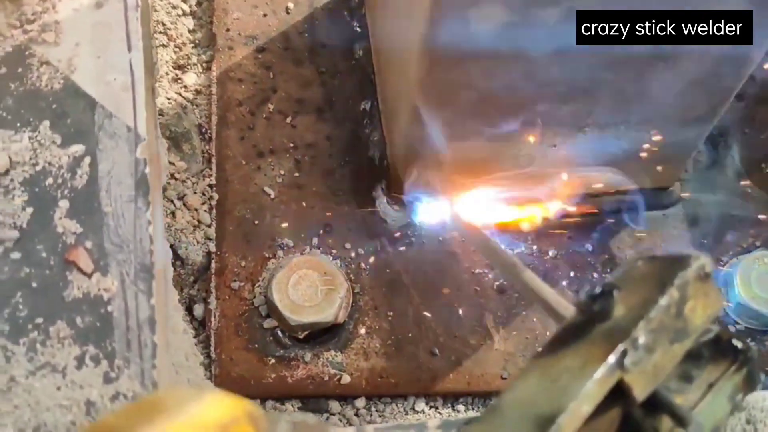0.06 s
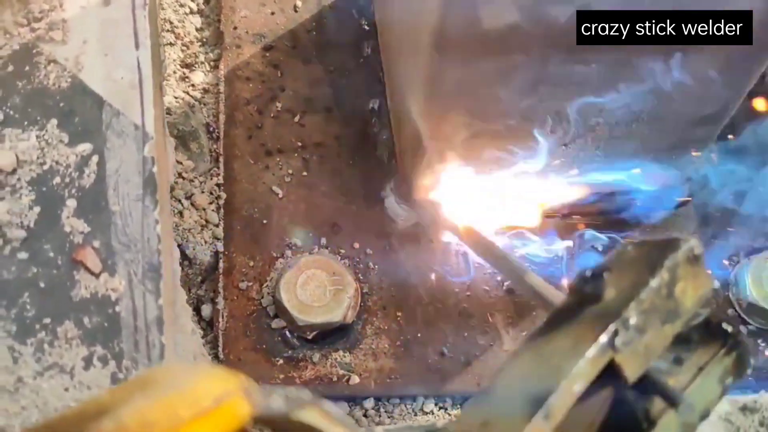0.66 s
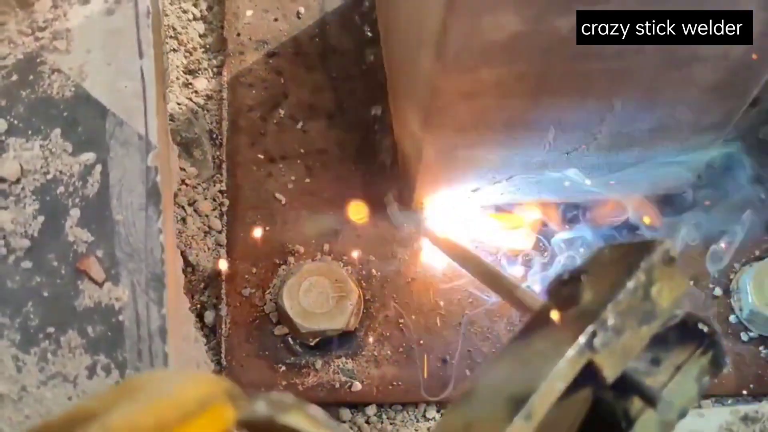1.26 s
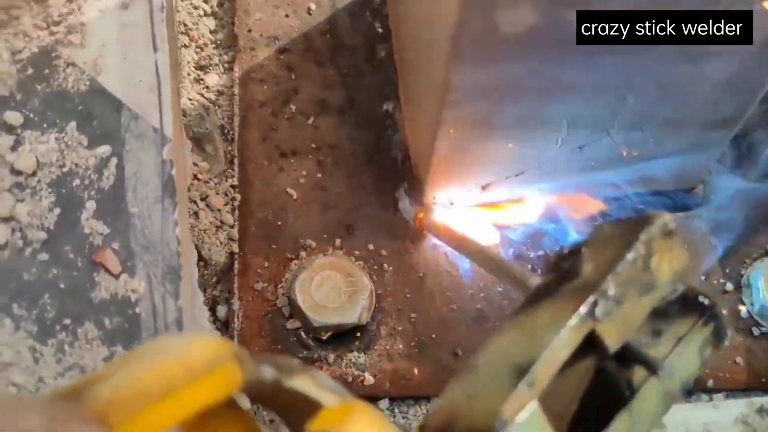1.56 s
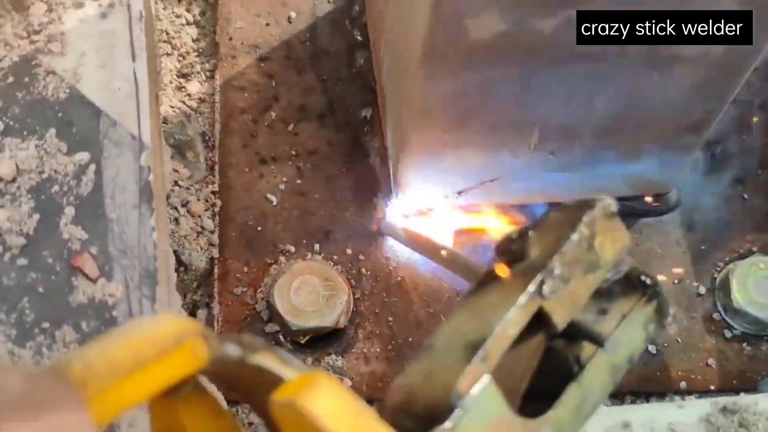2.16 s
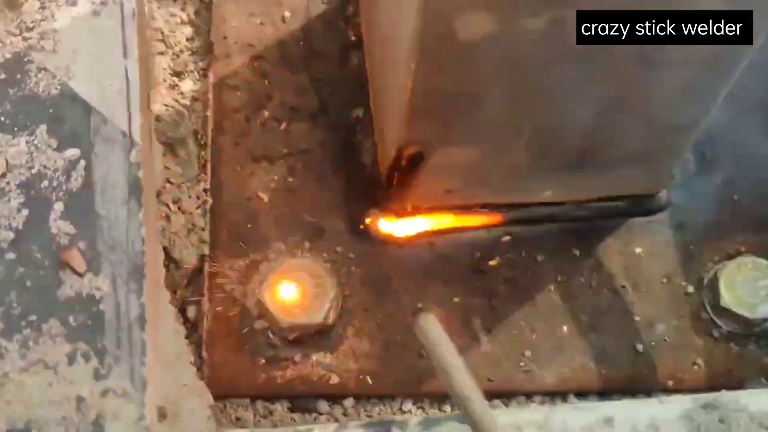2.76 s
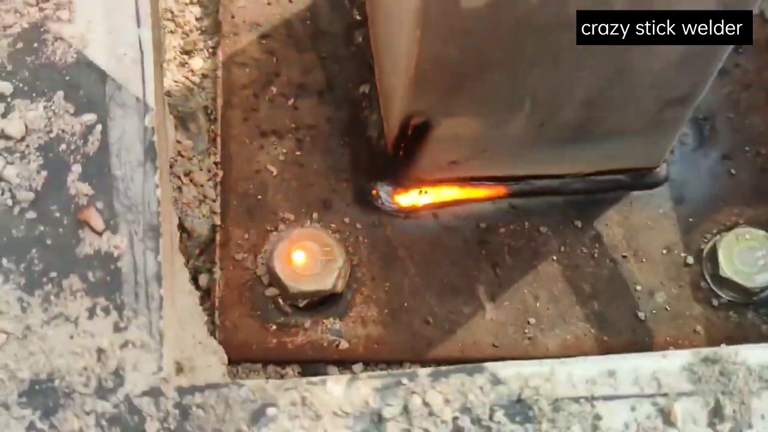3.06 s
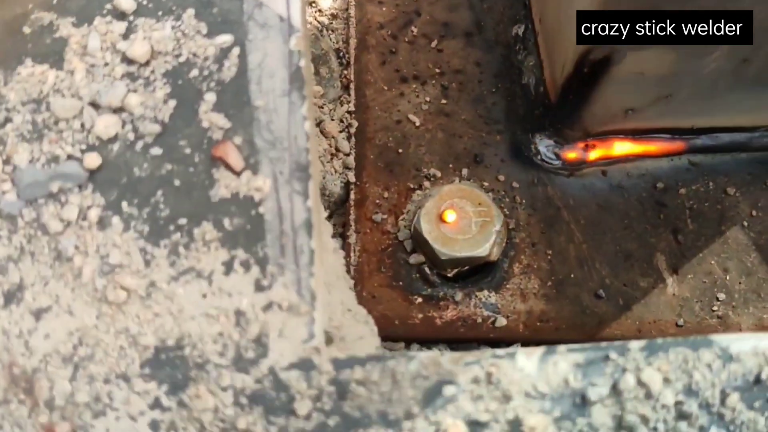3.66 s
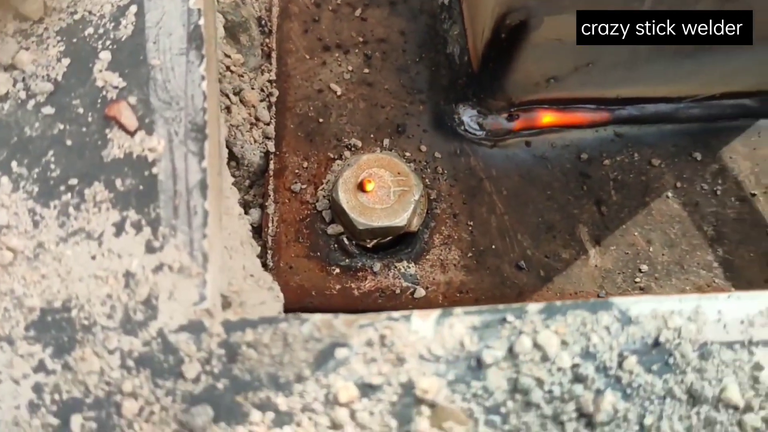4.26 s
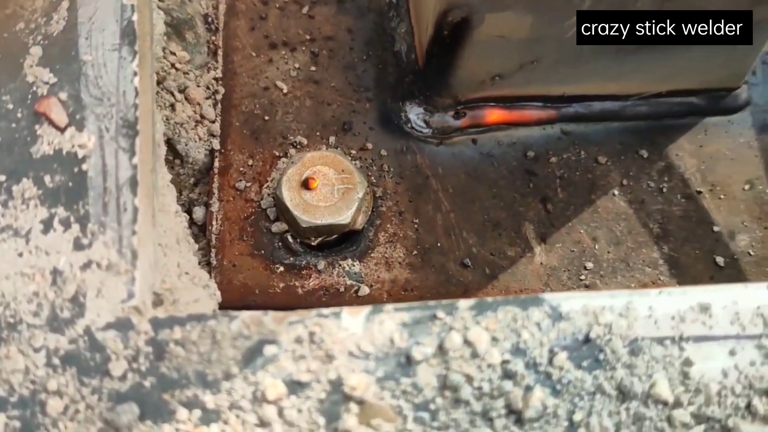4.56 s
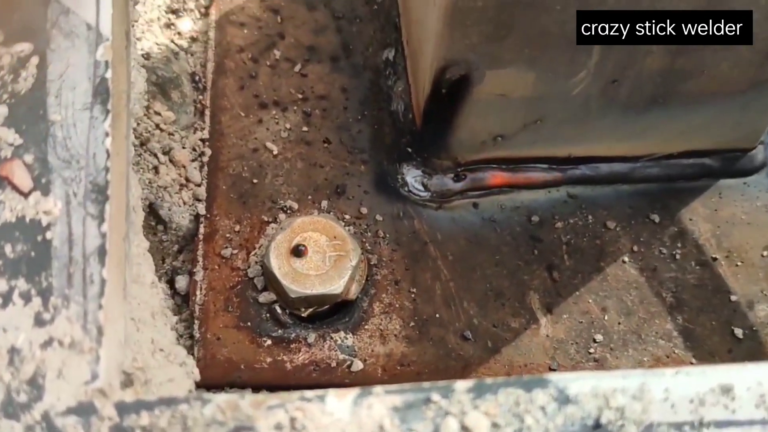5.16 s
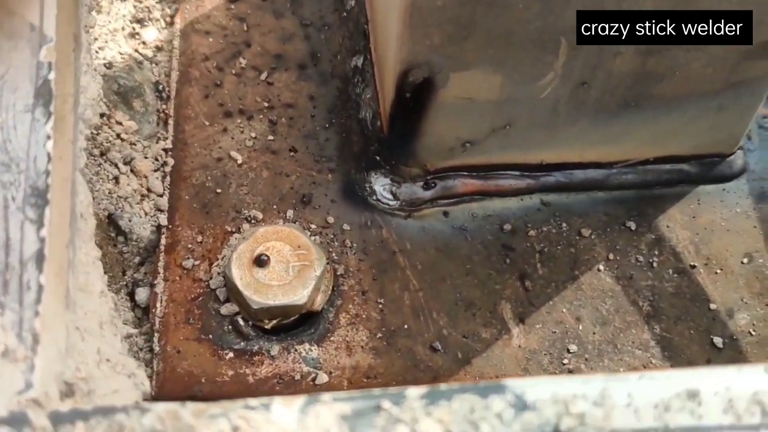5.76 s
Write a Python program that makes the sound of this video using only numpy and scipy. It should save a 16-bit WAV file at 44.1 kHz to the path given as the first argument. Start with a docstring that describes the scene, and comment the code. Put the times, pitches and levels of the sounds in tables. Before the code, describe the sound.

A stick welding arc sizzles and crackles close to the microphone, dotted with dull, irregular pops and bright spits of molten metal. After about three seconds it flares with a brief rasp and cuts out, leaving a faint fizz. The rod scrapes softly over grit, and its metal holder clacks several times as it is put down with a few soft knocks. A machine hums faintly in the background of the work site.

```python
"""A close sizzle, dotted with dull pops: a stick-welding arc lays a bead at the foot of a steel post.
Tiny discharges crackle over a rush of gas, and bursting drops of metal send out pressure pulses.
The arc flares as the rod is pulled away, and dies with a faint fizz. Then the rod scrapes over grit;
its holder clacks as impacts excite its modes, and is put down. A machine hums in the background."""
import sys
import numpy as np
from scipy import signal
from scipy.fft import rfft, irfft, next_fast_len
from scipy.io import wavfile
from scipy.ndimage import uniform_filter1d

SR = 44100
rng = np.random.default_rng(int(sys.argv[2]) if len(sys.argv) > 2 else 0)


def store_pcm(level_fs):
    """Save levels as 16-bit WAV."""
    pcm = np.round(np.clip(level_fs, -1, 1) * 32767).astype(np.int16)
    wavfile.write(sys.argv[1], SR, np.atleast_2d(pcm).T)


N = 256203
TIME = np.arange(N) / SR
ARC_OUT_S = 2.905

# Levels in tables are relative; pan is the level of the left side over the right.
# largest bursting drops: (time [s], level [dB], pitch [Hz], pan [dB], likeness of the sides [ratio])
DROPS = [(0.0379, -0.5, 522.6, -2.5, -0.84), (0.0778, 0.5, 365, 0, 1), (0.0892, -8, 448, -2, 0.65),
         (0.1046, -12, 447, -6, 0.18), (0.191, 0.5, 465, 3, -0.71), (0.236, -0.5, 390, 5, -1.2),
         (0.2634, -9, 610, -8, -0.84), (0.276, -8.5, 483, -4, 0), (0.29, -2, 350, -7, -0.01),
         (0.331, -2.5, 404, -8.5, -1.6), (0.3713, -10.5, 423, -23, -0.45), (0.469, -1.5, 325, 20, 0.5),
         (0.4845, -2.5, 320, 8, 0.5), (0.6929, 1.5, 440, -5, -0.61), (0.809, -15, 480, 6, 0.6),
         (0.9218, 0.5, 355, 10, -1.14), (0.9587, 1.5, 510, -1.5, 0.18), (0.9833, -4, 494, 4, -0.86),
         (0.993, -2, 527, -3, -0.96), (1.087, 0.5, 416, 5.5, -0.64), (1.1477, -3, 427, 3.5, -0.98),
         (1.1747, -7, 430, -4, 0.48), (1.3078, -7.5, 550, -5, 0.83), (1.3384, -13, 520, -2, 0.5),
         (1.386, -1.5, 385, -9.5, 0.5), (1.4296, 0, 370, -0.5, 0.96), (1.4423, -4.5, 372, 2, 0.97),
         (1.6417, 1.5, 307, 2, 1), (1.7418, -2, 490, -10, -0.19), (1.812, -2.5, 350, 11, -0.39),
         (1.8463, -0.5, 383, 0.5, -0.93), (1.864, -4.5, 395, -28, -0.17), (1.9894, 0, 450, -12, -0.43),
         (2.0066, -1, 530, -24, 0.16), (2.0213, -2.5, 530, -26, 1), (2.027, -3.5, 600, -26, -0.13),
         (2.1636, 0, 420, -6, -0.17), (2.178, -1.5, 730, -10, -0.18), (2.1848, 1, 340.5, 3, 0.85),
         (2.2035, -9.5, 386, 10, 0.99), (2.217, -10, 450, -2, 0.58), (2.231, -1.5, 365, -24, -0.084),
         (2.2405, -13, 500, -4, -0.0036), (2.2468, -5, 520, -2, -1.2), (2.345, -3, 362, -27, -0.11),
         (2.4229, -6, 530, -7, -1.1), (2.4477, -4.5, 340, -15, -0.19), (2.4845, -3, 358, -0.5, -1),
         (2.5063, -9, 440, 6.5, -1), (2.5778, -5.5, 340, -21, -0.068), (2.593, -9.5, 460, 10, 1),
         (2.5994, -4, 566, -6.5, -0.39), (2.6252, -12.5, 450, -12, -0.16), (2.6559, -6, 563, -19, 1),
         (2.6726, -4, 405, -14, -0.2), (2.685, -4.5, 346, 9, 0.86), (2.718, -5.5, 360, 8, 0.65),
         (2.7327, -2.5, 487, -13, -0.44)]
# drops that bridge the gap: (time of the restrike [s], time choked before it [s], snap level [dB])
SHORT_CIRCUITS = [(0.7622, 0.006, -15), (2.7650, .001, -16)]
# spectrum of rushing gas: (frequency [Hz], spectral density [dB])
GAS_SPECTRUM = [(50, -4), (130, -10), (300, -11), (700, 2.5), (2200, 6), (2900, -4.5), (4000, -2.5),
                (11000, -16)]


def arc(hiss_db=-0.3, rush_db=-9.0, rush_follows=0.88, pan_db=-7, travel_db_per_s=2):
    """Source and filter: discharges in boiling metal sizzle in bright bands over a rush of gas."""
    # vigour of the arc: (time [s], level [dB])
    vigour = [(0.0, -36), (0.19, -31), (0.36, -36), (0.44, -28.5), (0.79, -32), (0.89, -25.5),
              (0.95, -32.5), (1.07, -33), (1.32, -26), (1.47, -31), (1.55, -27), (1.68, -34.5), (1.75, -30),
              (1.91, -37), (2.01, -34.5), (2.08, -33), (2.16, -31.5), (2.28, -42.5), (2.34, -33),
              (2.4, -37.5), (2.44, -30), (2.55, -41.5), (2.6, -33.5), (2.81, -38), (2.88, -40)]
    # bright peaks of the sizzle: (frequency [Hz], width [Hz], level [dB], pan [dB])
    sizzle_peaks = [(3410, 920, -6.5, 30.5), (4250, 840, -7.5, 19), (4960, 510, -7, -3),
                    (6220, 430, -1.5, 19), (6990, 140, 0, -17.5), (7505, 390, 2, 3), (8650, 270, 2, 3.5),
                    (9380, 640, -2.5, 2.5), (11920, 940, -1.5, 12.5), (12320, 280, -2.5, -24),
                    (13220, 420, 2, 6)]
    # peaks of the top hiss: (frequency [Hz], width [Hz], level [dB], pan [dB])
    hiss_peaks = [(14860, 360, -3, 1), (14800, 350, -5, -16), (15500, 340, 2.5, -1)]
    vigour_db, = in_time(vigour)
    mean_db = np.mean([db for s, db in vigour])
    flow_db = mean_db + rush_follows * (vigour_db - mean_db)
    flicker = boiling()
    sparks = rms_one(crackle(per_s=1400, smooth=.8, alike=.62))
    sparks = echoed(sparks, wet_db=-4, t60=.12)   # the corner between post and plate rings briefly
    sizzle = wavering_peaks(sparks, sizzle_peaks, waver_db=4.0, glide=0.021)
    hiss = from_db(hiss_db) * wavering_peaks(sparks, hiss_peaks, waver_db=0.5, glide=0.004)
    frying = crackle(per_s=900, smooth=1.4, alike=0.3)
    rush = from_db(flow_db + rush_db) * flicker * coloured(frying, GAS_SPECTRUM)
    sound = from_db(vigour_db) * (flicker * (sizzle + hiss) + spatter()) + rush
    return burning() * sound * panned(pan_db + travel_db_per_s * TIME)   # travel along the seam


def boiling(depth=0.22, build_s=0.025):
    """Amplitude modulation: a gain that flickers at random and boils up before each drop bursts."""
    bursts = np.zeros(N)
    bursts[[round(s * SR) for s, *_ in DROPS]] = 1
    build_up = decaying(bursts[::-1], build_s)[::-1]
    return rms_one((1 + depth * build_up) * from_db(1.2 * drift(150) + drift(35)))


def burning(choked_gain=.15, lull_s=0.027, lull_db=-7.5):
    """Gating: the arc's gain collapses in a short circuit, stays low briefly, and ends with the arc."""
    gain = np.clip((ARC_OUT_S - TIME) / 0.013, 0, 1)
    for s, choked_s, _ in SHORT_CIRCUITS:
        gain[(TIME > s - choked_s) & (TIME < s)] *= choked_gain
        gain[(TIME > s) & (TIME < s + lull_s)] *= from_db(lull_db)
    return gain


def wavering_peaks(x, peaks, waver_db, glide):
    """Random modulation: the sizzle's bright peaks waver in pitch and strength; rms 1."""
    out = 0
    for hz, width, db, pan_db in peaks:
        band = resonance(x, hz * (1 + glide * drift(10.7)), width)
        out = out + band * panned(pan_db) * from_db(db + waver_db * drift(15.3))
    # the peaks trade strength while their total power stays the same
    power = uniform_filter1d(np.mean(out ** 2, axis=0), size=SR // 16)
    return rms_one(out / np.sqrt(power + 1e-12))


def spatter(grit_per_s=75, grit_db=-2):
    """Shot noise: a few bright spits and many lesser ones, each dying within milliseconds."""
    # bright spits: (time [s], level against the sizzle [dB])
    spit_events = [(0.168, 7), (0.1902, 9), (0.2367, 8), (0.3728, 10), (0.4364, 10), (0.6965, 9),
                   (0.735, 9), (1.308, 7), (1.3864, 8), (1.5476, 10), (1.7296, 9), (2.4235, 9), (2.798, 12)]
    spits = sum(from_db(db) * swell(s, rise_s=.0004, fall_s=.0026) for s, db in spit_events)
    impulses = (rng.random(N) < grit_per_s / SR) * np.minimum(rng.exponential(1, N), 2)
    grit = from_db(grit_db) * decaying(impulses, fall_s=0.0011)
    return (spits + grit) * bass_cut(noise(0.093), hz=1800)


def pops(front_ratio=3.47, snap_db=-10, snap_spread_db=4, crack_db=-16, rebound=0.19):
    """Pulse radiation: drops burst with a sharp front and a swell of gas, then the pool rebounds."""
    out = np.zeros((2, N))
    for s, db, hz, pan_db, alike in DROPS:
        sign, lag, delay, recoil, sharpness = rng.uniform(-1, 1, 5)
        sides = panned(pan_db) * np.sign(sign)
        body = out_of_step(puff(db, hz), hz, alike) * sides
        # heavy, low drops thump roundly; light ones snap
        front_db = db + snap_db + snap_spread_db * (sharpness + 2 * np.log2(hz / 450))
        front_hz = front_ratio * hz
        front = out_of_step(puff(front_db, front_hz, stretch=0.77), front_hz, (1 + alike) / 2) * sides
        for side, channel in zip((1, -1), np.eye(2)[:, :, None]):
            add(out, s + side * lag * 0.00019, (body + front) * channel)
            add(out, s + 0.00156 * (2 + side * delay), rebound * recoil * body * channel)
        add(out, s, crack(front_db + crack_db) * panned(pan_db))
    # a drop is too large to radiate the treble
    return treble_cut(bass_cut(out, hz=116), hz=2900, order=4)


def puff(level_db, hz, stretch=1):
    """A bipolar pressure pulse: swelling gas gives one fast push and a slower pull."""
    phase = 2 * np.pi * hz * TIME[:SR // 25] / stretch
    return from_db(level_db) * phase * (2 - phase) * np.exp(-phase)


def crack(level_db, t60=0.032):
    """A broadband transient: the sharp edge of a burst, as fast-decaying noise."""
    t = TIME[:SR // 20]
    edge = coloured(noise(0.2, size=len(t)), [(200, 7.5), (900, 2.0), (2200, 2.5), (9000, -39.0)])
    return edge * from_db(level_db - 60 * t / t60)


def churn(level_db=-31.0, fall_at_400_hz_s=0.0099, spray_db=-7):
    """Damped motion: the pool gurgles and sprays at each pop, for longer after heavy, low drops."""
    # spectrum of the churning pool: (frequency [Hz], spectral density [dB])
    pool_spectrum = [(80, -13), (280, 2.5), (650, -5), (1500, -4), (3000, -35)]
    stirring = sum(from_db(db + level_db) * swell(s, .0007, fall_at_400_hz_s * 400 / hz) * panned(pan_db)
                   for s, db, hz, pan_db, _ in DROPS)
    spray = coloured(crackle(per_s=900, smooth=1, alike=.3), GAS_SPECTRUM)
    gurgle = coloured(noise(1.0), pool_spectrum)
    return stirring * (gurgle + from_db(spray_db) * spray)


def restrikes(t60=0.012, crack_db=10, crack_hz=1400):
    """Electrical breakdown: the choked arc strikes again with one sharp pulse and a bright spray."""
    out, t = np.zeros((2, N)), TIME[:SR // 25]
    for s, _, db in SHORT_CIRCUITS:
        spray = coloured(noise(0.056, size=len(t)), [(1800, -15.5), (6000, -17), (15000, 15.5)])
        add(out, s, spray * from_db(db - 60 * t / t60) + puff(db + crack_db, crack_hz))
    return bass_cut(out, hz=400)


def bubbling(count=190, level_db=-25, size_db=7):
    """Pitch falls with size: small slag bubbles burst at random, the larger ones lower and louder."""
    out = np.zeros((2, N))
    for when, size, sign, where in rng.uniform(-1, 1, (count, 4)):
        pulse = np.sign(sign) * puff(level_db + size_db * size, 600 * 2 ** -size, stretch=0.55)
        add(out, (when + 1) / 2 * ARC_OUT_S, pulse * panned(10 * where))
    return bass_cut(out, hz=75)


def flare(start_s=2.848, level_db=-24.5, sputter_db=2):
    """Noise-driven resonance: the stretched arc rasps, wavers and sputters just before it breaks."""
    # resonances of the stretched arc: (frequency [Hz], width [Hz], level [dB])
    flare_peaks = [(450, 780, 6), (1140, 230, 13.5), (1540, 380, 10.5), (2100, 390, 11.5), (4140, 1600, -3),
                   (7740, 1600, -2.5)]
    sparks = crackle(per_s=1200, smooth=.6, alike=.5) * from_db(sputter_db * drift(260))
    waver = 1 + .06 * drift(20)
    roar = rms_one(sum(from_db(db) * resonance(sparks, hz * waver, width)
                       for hz, width, db in flare_peaks))
    envelope = swell(start_s, rise_s=.013, fall_s=.002, hold_s=ARC_OUT_S - start_s)
    return from_db(level_db) * envelope * roar * panned(-5.0)


def holder(ring_db=-10, crack_db=-1, crack_t60=0.02, tail_db=-25, tail_t60=0.32, rise_s=0.00096):
    """Modal ringing: each clack is a short chatter of steel on steel that excites the holder's modes."""
    # impacts: (time [s], level [dB], gain below 3 kHz [dB])
    clacks = [(3.762, -31, 3), (3.821, -21, 4.5), (3.919, -25, -23), (3.9229, -8.5, -2), (3.956, -9, 0),
              (3.973, -24, -4), (4.05, -21.5, -23), (4.079, -35, -5), (4.176, -40.5, -9), (4.3357, -28, 4),
              (4.3484, -24.5, 2.5), (4.7221, -29, -8.5), (5.153, -45.5, 6), (5.5936, -44.5, -13)]
    # modes of holder and rod: (frequency [Hz], level [dB], t60 [s])
    modes = [(1070, -18, 0.066), (1840, -17, 0.082), (2100, -0.5, 0.065), (2266, 3, 0.045),
             (2415, -6, 0.072), (2670, -6.5, 0.058), (3060, -14, 0.095), (3530, -13, 0.07),
             (4176, -13.5, 0.12), (4860, -10, 0.041), (6630, -10, 0.091), (6680, -9, 0.053),
             (9100, -18, 0.1)]
    # spectrum of the chatter: (frequency [Hz], spectral density [dB])
    chatter_spectrum = [(120, -35), (290, -2), (700, -10.5), (1100, -14), (1600, -11.5), (2270, 5),
                        (3300, -13), (5500, -17.5), (6800, -5.5), (8800, -11.5), (10300, -20),
                        (15000, -15.5)]
    out, t = np.zeros((2, N)), TIME[:SR // 4]
    hz, mode_db, t60 = np.transpose(modes)[:, :, None]
    for s, db, low_db in clacks:
        strength = from_db(mode_db + low_db * (hz < 3000) + rng.normal(0, 0.93, (2, len(modes), 1)))
        cycles = hz * t + rng.random((len(modes), 1)) + 0.18 * rng.standard_normal(strength.shape)
        partials = strength * np.sin(2 * np.pi * cycles) * from_db(-60 * t / t60)
        ringing = from_db(ring_db) * np.sum(partials, axis=1)
        spectrum = [(f, level + low_db * (f < 3000)) for f, level in chatter_spectrum]
        chatter = coloured(noise(0.073, size=len(t)), spectrum)
        decay = from_db(crack_db - 60 * t / crack_t60) + from_db(tail_db - 60 * t / tail_t60)
        add(out, s, from_db(db) * (ringing + chatter * decay) * np.minimum(t / rise_s, 1))
    return out


def fizz_and_scrape(fall_s=0.059, slip_s=0.0049):
    """Granular noise: a faint fizz as the arc dies, then the rod scrapes grit with stick-slip squeaks."""
    # the fizz, then two scrapes: (time [s], rise [s], hold [s], level [dB])
    spells = [(2.91, .01, 0.19, -49), (3.615, 0.11, 0.49, -46), (4.337, 0.0033, 0.018, -38)]
    # bright peaks of the fizzing and scraping sound: (frequency [Hz], width [Hz], level [dB])
    scrape_peaks = [(1330, 350, 3), (2340, 510, 1.5), (4350, 1800, -10.5), (6880, 700, 1), (8800, 1500, -7),
                    (12400, 3000, -10.5), (15000, 1200, -2)]
    # slips of the rod: (time [s], level [dB])
    slips = [(4.353, -28), (4.374, -37), (4.394, -29), (4.421, -38)]
    # bright peaks of the squeak: (frequency [Hz], width [Hz], level [dB])
    squeak_peaks = [(6840, 340, -1), (14900, 830, -14)]
    grains = crackle(per_s=1800, smooth=1, alike=.4) * from_db(2 * drift(60) + 2.5 * drift(12))
    rasp = rms_one(sum(from_db(db) * resonance(grains, hz, width) for hz, width, db in scrape_peaks))
    squeak = rms_one(sum(from_db(db) * resonance(noise(0.54), hz, width)
                         for hz, width, db in squeak_peaks))
    envelope = sum(from_db(db) * swell(s, rise, fall_s, hold) for s, rise, hold, db in spells)
    slipping = sum(from_db(db) * swell(s, slip_s, slip_s) for s, db in slips)
    return envelope * rasp + slipping * squeak


def handling(knock_db=13, thud_db=-14, thud_t60=0.13):
    """Soft contact excites mainly low frequencies: gloves and cable rumble, knocks thud hollowly."""
    # movements of gloves and cable: (time [s], level [dB], pan [dB])
    movements = [(3.95, -48.5, 6), (4.08, -42.5, -2), (4.358, -33.5, 0.5), (4.519, -38, -23),
                 (4.71, -39.5, 2), (5.749, -34.5, -12)]
    # spectrum of their rumble: (frequency [Hz], spectral density [dB])
    rumble_spectrum = [(30, -34), (80, -6), (170, 4), (280, 3.5), (500, -1.5), (1000, -56)]
    # soft knocks: (time [s], level [dB], pitch [Hz], pan [dB])
    knock_events = [(3.9946, -24, 935, -6), (4.336, -22.5, 1720, 8), (4.3367, -12.5, 357, 5.5),
                    (4.52, -27, 187, -15), (5.175, -31, 140, 16)]
    moving = sum(from_db(db) * swell(s, rise_s=0.054, fall_s=0.072) * panned(pan_db)
                 for s, db, pan_db in movements)
    rumble = moving * coloured(noise(0), rumble_spectrum)
    knocks, t = np.zeros((2, N)), TIME[:SR // 4]
    for s, db, hz, pan_db in knock_events:
        spectrum = [(hz / 4, -20), (hz / 2, 0), (hz, 0), (3 * hz, -45), (SR / 2, -80)]
        thud = coloured(noise(.5, size=len(t)), spectrum)
        padded_pulse = treble_cut(puff(db + knock_db, hz), 2 * hz, order=2)
        add(knocks, s, padded_pulse * panned(pan_db))
        add(knocks, s, thud * from_db(db + thud_db - 60 * t / thud_t60) * panned(pan_db))
    return rumble + bass_cut(knocks, hz=163)


def background(air_db=-45, hum_gain_db=1.2, early_db=-6, wander_hz=2.79):
    """Line spectrum over noise: a machine's wavering hum and the site, both louder once the arc is out."""
    # tones of the machine: (frequency [Hz], level [dB])
    hum_lines = [(323.0, -55.5), (457.6, -51.5), (527.6, -58)]
    # noise of the site: (frequency [Hz], spectral density [dB])
    site_spectrum = [(30, -22), (100, -14.5), (270, -4.5), (480, -10), (650, -13.5), (1100, -22),
                     (1800, -22.5), (4600, -43), (7000, -40), (16000, -48.5)]
    hum = 0
    for hz, db in hum_lines:
        phase = 2 * np.pi * np.cumsum(hz + wander_hz * drift(14.1)) / SR
        amplitude = np.sqrt(2) * from_db(db + hum_gain_db + 2 * drift(14.0))
        hum = hum + amplitude * np.sin(phase + [[0], [1]])   # the sides are one radian apart
    air = from_db(air_db) * coloured(noise(0), site_spectrum)
    return (hum + air) * from_db(early_db * np.clip(10 * (ARC_OUT_S - TIME), 0, 1))


def echoed(x, wet_db, t60):
    """Reverberation: add scattered echoes that start after 2 ms and decay exponentially."""
    t = TIME[:SR]
    echoes = noise(0.12, size=SR) * from_db(-60 * t / t60) * (t > .002)
    echoes = echoes / np.sqrt(np.sum(echoes ** 2, axis=1, keepdims=True))
    return x + from_db(wet_db) * signal.fftconvolve(x, echoes, axes=1)[:, :N]


def out_of_step(x, hz, alike):
    """Phase difference: a close pulse reaches the sides in step (1), in quadrature (0) or opposed (-1)."""
    omega, alike = 2 * np.pi * hz, np.clip(alike, -1, 1)
    quadrature = signal.lfilter(*signal.bilinear([-1, omega], [1, omega], SR), x)
    return np.array([x, alike * x + np.sqrt(1 - alike ** 2) * quadrature])


def resonance(x, hz, width):
    """Heterodyne filter: shift down, low-pass and shift back, for a steep peak whose centre may move."""
    carrier = np.exp(2j * np.pi * np.cumsum(hz * np.ones(N)) / SR)
    pole = np.exp(-1.5 * np.pi * width / SR)
    return (signal.sosfilt([[1 - pole, 0, 0, 1, -pole, 0]] * 3, x / carrier) * carrier).real


def crackle(per_s, smooth, alike):
    """A Poisson process: tiny random clicks over a smooth hiss."""
    grains = (rng.random(N) < per_s / SR) * (1 + rng.exponential(1, N))
    return (rms_one(grains) + smooth) * noise(alike)


def noise(alike, size=N):
    """Partial coherence: stereo white noise whose sides have the correlation `alike`."""
    mid, side = rng.standard_normal((2, size))
    alike = np.clip(alike, -1, 1)
    return np.sqrt((1 + alike) / 2) * mid + np.sqrt((1 - alike) / 2) * side * [[1], [-1]]


def drift(corner_hz):
    """Random fluctuation: low-passed noise with an rms of about 1."""
    step = 16   # samples between control points
    size = next_fast_len(N // step + 1, real=True)
    freqs = np.fft.rfftfreq(size, step / SR)
    slow = irfft(rfft(rng.standard_normal(size)) / (1 + (freqs / corner_hz) ** 2), size)
    return np.interp(TIME, np.arange(size) * step / SR, rms_one(slow))


def coloured(x, spectrum):
    """Spectral shaping by a curve of (frequency [Hz], level [dB]); rms 1."""
    hz, db = np.transpose(spectrum)
    freqs = np.maximum(np.fft.rfftfreq(x.shape[-1], 1 / SR), 1)
    gain = from_db(np.interp(np.log(freqs), np.log(hz), db))
    return rms_one(irfft(rfft(x) * gain, x.shape[-1]))


def bass_cut(x, hz):
    """Radiation efficiency: small sources give out little deep bass."""
    return signal.sosfilt(signal.butter(2, hz, "high", fs=SR, output="sos"), x + 1e-18)


def treble_cut(x, hz, order):
    """Low-pass filtering rounds off sharp edges."""
    return signal.sosfilt(signal.butter(order, hz, fs=SR, output="sos"), x)


def swell(s, rise_s, fall_s, hold_s=0):
    """Exponential envelope: it grows to 1 at time s, holds, and dies away."""
    return np.exp(-np.clip(np.maximum((s - TIME) / rise_s, (TIME - s - hold_s) / fall_s), 0, 50))


def decaying(impulses, fall_s):
    """Leaky integration gives each impulse an exponential tail."""
    return signal.lfilter([1], [1, -np.exp(-1 / (fall_s * SR))], impulses + 1e-18)


def panned(pan_db):
    """Level difference: left and right gains of constant power."""
    gains = from_db(np.array([[.5], [-.5]]) * pan_db)
    return gains / np.sqrt(np.mean(gains ** 2, axis=0))


def add(out, s, sound):
    """Superposition: mix a sound in at time s."""
    start = round(s * SR)
    out[:, start:start + sound.shape[-1]] += sound[..., :N - start]


def in_time(rows):
    """Linear interpolation of each column of a curve to every sample."""
    s, *columns = np.transpose(rows)
    return [np.interp(TIME, s, column) for column in columns]


def from_db(db):
    """Decibels to amplitude ratio."""
    return 10 ** (np.asarray(db) / 20)


def rms_one(x):
    """Normalisation to unit power."""
    return x / np.sqrt(np.mean(x ** 2) + 1e-20)


def scene():
    """Superposition: weld and clacks, echoed weakly by the steelwork, over the quieter sounds."""
    weld = arc() + pops() + churn() + restrikes() + bubbling() + flare()
    weld_and_clacks = echoed(weld + holder(), wet_db=-20.5, t60=0.15)
    return weld_and_clacks + fizz_and_scrape() + handling() + background()


def record(dry):
    """Band limiting: a steep low-pass removes the highest treble."""
    cutoff_hz = 15900
    return signal.sosfilt(signal.ellip(12, .2, 80, cutoff_hz, fs=SR, output="sos"), dry)


dry = scene()
out = record(dry)
store_pcm(out)
```